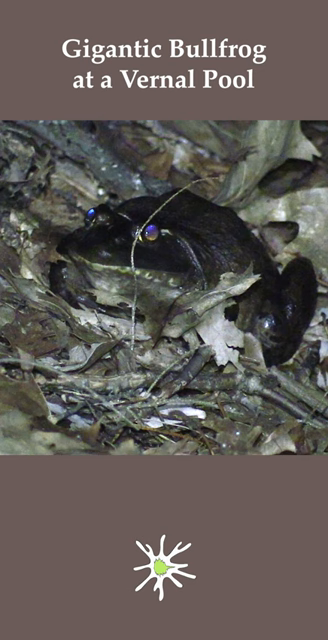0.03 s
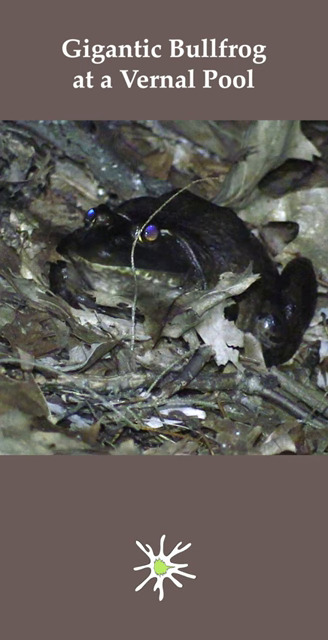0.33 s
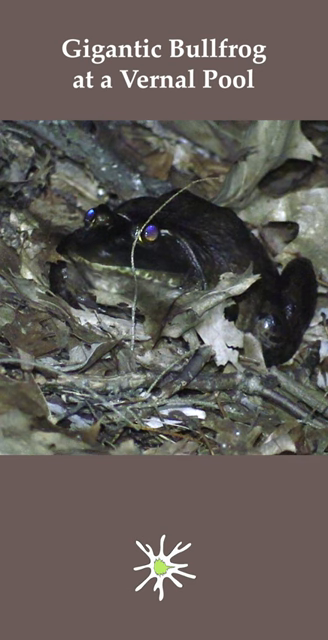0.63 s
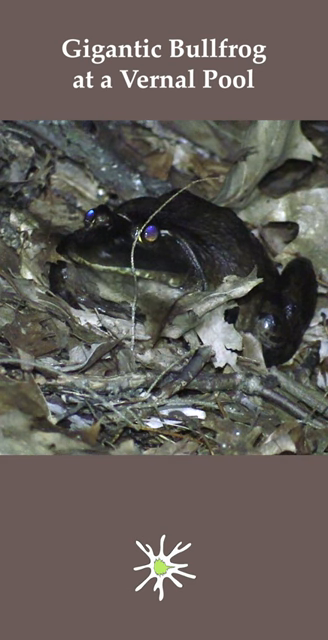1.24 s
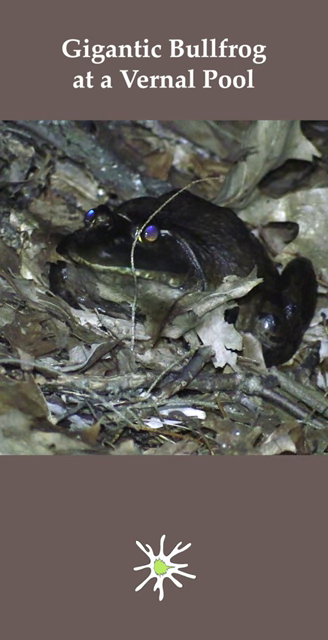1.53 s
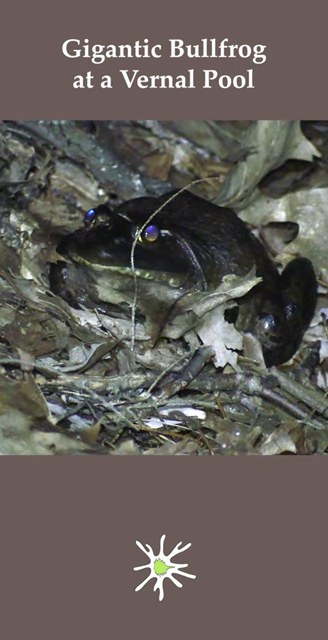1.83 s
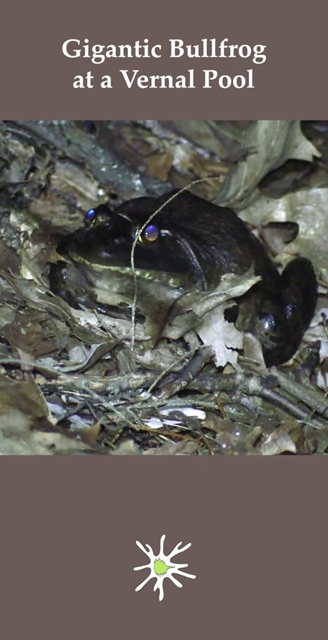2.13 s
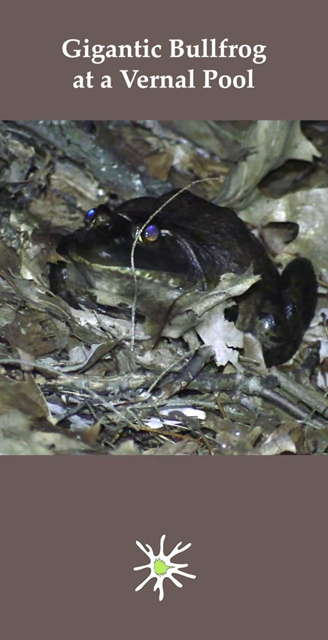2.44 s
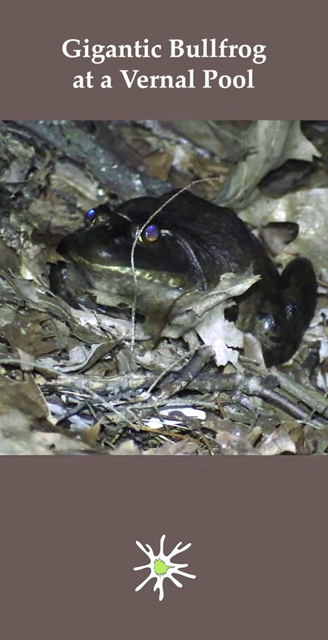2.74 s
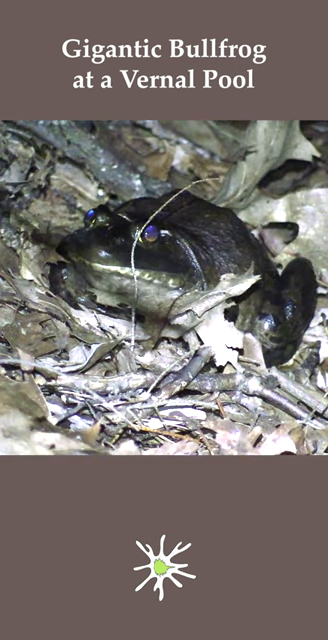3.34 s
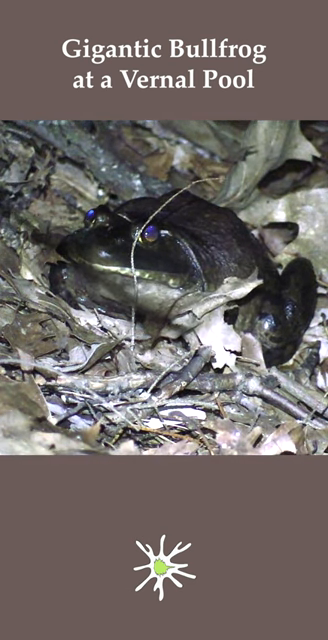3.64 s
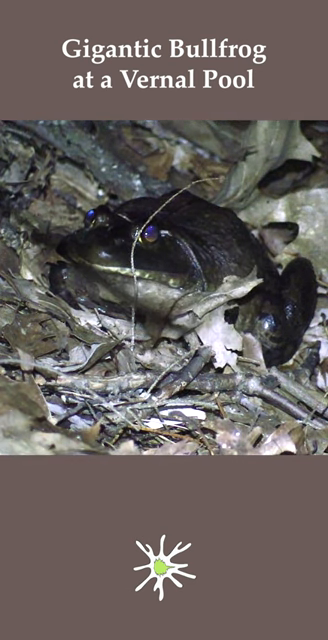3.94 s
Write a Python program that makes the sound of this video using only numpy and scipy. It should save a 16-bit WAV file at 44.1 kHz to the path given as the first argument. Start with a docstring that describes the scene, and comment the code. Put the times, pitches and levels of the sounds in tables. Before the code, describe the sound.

High, rising peeps of distant small frogs echo among trees over a soft rumble and hiss. A dry leaf snaps lightly near the microphone at the start, and about midway a single louder peep comes from the right.

```python
"""Tree frogs at a night pool

A stereo microphone by a woodland pool: one small frog peeps close on the right, the others far off.
Each peep is a pure rising whistle that the trees scatter into a long blurred tail.
Leaf litter ticks near the microphone; faint rustles and a few soft low bumps pass.
Under it all lie a distant rumble and a faint hum."""
import sys
import numpy as np
from scipy import signal
from scipy.fft import rfft, irfft
from scipy.io import wavfile
from scipy.ndimage import uniform_filter1d

SR = 44100
rng = np.random.default_rng(int(sys.argv[2]) if len(sys.argv) > 2 else 0)


def transcribe(u):
    """Save the signal u as a 16-bit wav file named by the first command-line argument.

    u: samples, shape (n,) or (channels, n), limited to [-1, 1]; the rate is SR.
    q: integer samples, one column per channel.
    """
    v = np.clip(np.atleast_2d(u).T, -1, 1)
    q = np.round(v * 32767).astype(np.int16)
    wavfile.write(sys.argv[1], SR, q)


N = 176400
HZ = np.fft.rfftfreq(N, 1 / SR)

# Distant rumble and hiss. Each row: frequency in Hz, relative spectral level in dB.
AIR_SPECTRUM = [(25, -23), (45, -13), (70, -3), (140, 1), (200, -1.5), (320, -3), (520, -4), (740, -5),
                (950, -4), (1400, -8.5), (2300, -16), (3800, -23), (4700, -25), (6000, -27), (9500, -31.5),
                (13000, -37), (15500, -43)]
# How alike the air is in the two channels. Each row: frequency in Hz, correlation.
AIR_CORRELATION = [(30, 0.48), (110, 0.99), (260, 0.81), (600, 0.48), (1300, 0.35), (4000, 0.51),
                   (12000, 0.64)]
# Where the air sits. Each row: frequency in Hz, pan in dB (always left minus right).
AIR_PAN = [(60, -2), (280, -1.5), (700, -5), (1400, -5), (4400, -1.5), (9000, -0.5)]
# The far hum. Each row: frequency in Hz, level in dB.
HUM_TONES = [(240, -52), (488, -58)]
# Frogs far off. Each row: start and length in seconds, first and last pitch in Hz, level and pan in dB.
FAR_PEEPS = [(-.29, 0.14, 2590, 2853, -29.5, 0), (-.13, 0.12, 3040, 3317, -27, -3),
             (-.04, .11, 3246, 3510, -32, -8), (0.176, 0.17, 2810, 3305, -31.5, -6),
             (0.438, 0.082, 3072, 3390, -24, -5.5), (.595, 0.14, 2930, 3265, -30, -5.5),
             (0.762, .09, 3150, 3428, -31, -5), (0.882, 0.12, 2950, 3302, -28.5, -3.5),
             (.885, 0.088, 3490, 3550, -37, -2), (1.104, 0.11, 2595, 2842, -30.5, -2),
             (1.615, 0.19, 2825, 3258, -33, -4), (2.03, .145, 2916, 3192, -31, -1),
             (2.214, 0.091, 2988, 3272, -30, -3.5), (2.51, .10, 2572, 2845, -31.5, -2.5),
             (2.629, 0.045, 3245, 3393, -34.5, -2.5), (2.828, 0.19, 2837, 3260, -31, -5.5),
             (3.674, 0.153, 2948, 3172, -34, -6.5)]
# The frog by the microphone. One row: start and length in seconds, first and last pitch in Hz.
CLOSE_PEEP = (1.723, .119, 2825, 3112)
# A peep's weak upper partials. Each row: multiple of the pitch, relative level in dB.
PEEP_PARTIALS = [(1.5, -33), (2, -42)]
# Faint rustles. Each row: start and length in seconds, centre in Hz, width in octaves, level in dB.
SOFT_RUSTLES = [(0.17, 0.28, 6600, 1, -53), (3.16, .28, 13400, .03, -65), (3.02, 0.59, 4100, 0.27, -55)]
# Low bumps. Each row: start and length in seconds, centre in Hz, level in dB.
LOW_BUMPS = [(.2, 0.13, 139, -39), (1.87, 0.079, 312, -41.5), (3.17, .09, 56, -47),
             (3.35, 0.14, 119, -39.5), (3.585, 0.071, 62, -40)]
# Dry leaves close by. Each row: start in seconds, level in dB, pan in dB.
LEAF_TICKS = [(.251, -19, -11), (.2562, -13, -8), (.5664, -41, -3), (.602, -31, -2.5)]
# The tone of one tick. Each row: frequency in Hz, relative level in dB.
TICK_SPECTRUM = [(500, -22), (2500, -6), (4100, -0.5), (5000, -12), (7500, -8.5), (9200, -3), (10800, -3.5),
                 (12100, 2.5), (13200, -10), (15500, -13.5)]

WOOD_T60_S, GROUND_T60_S = 1.23, 0.22  # a peep's decay among the trunks and off the ground
TICK_T60_S, LITTER_T60_S = 0.83, 0.0044  # a tick's decay among the trunks and in the litter


def amp(db):
    """Decibels to gain."""
    return 10 ** (np.asarray(db) / 20)


def unit(x):
    """Scales to rms 1."""
    return x / np.sqrt(np.mean(x ** 2) + 1e-20)


def curve(points, hz):
    """Reads a table on a log-frequency axis."""
    f, value = np.transpose(points)
    return np.interp(np.log(hz + 1), np.log(f + 1), value)


def pan(db):
    """Left and right gains of constant power; negative dB is to the right."""
    return unit(amp([[db / 2], [-db / 2]]))


def add(mix, start_s, sound):
    """Mixes a stereo sound in at start_s."""
    part = mix[:, max(round(start_s * SR), 0):][:, :sound.shape[1]]
    part += sound[:, :part.shape[1]]


def noise(spectrum):
    """Noise with the given spectrum, at rms 1."""
    return unit(irfft(spectrum * rfft(rng.standard_normal(N)), N))


def band_noise(hz, octaves):
    """Noise in a bell-shaped band around hz."""
    return noise(np.exp(-.5 * (np.log2((HZ + 1) / hz) / octaves) ** 2))


def night_air(level_db=-36.5, patch_db=0.44):
    """Distant rumble and hiss, a little to the right, with slight drifting patches in its spectrum."""
    grid = (N // 256 + 5, 513)  # time frames, frequency bins
    drift = uniform_filter1d(rng.standard_normal(grid), size=14, axis=0)
    patches = unit(uniform_filter1d(drift, size=8, axis=1))
    spectra = rng.standard_normal((2, *grid)) + 1j * rng.standard_normal((2, *grid))
    spectra *= amp(patch_db * patches)
    _, hiss = signal.istft(spectra.transpose(0, 2, 1), nperseg=1024, noverlap=768)
    left, unrelated = rfft(hiss[:, :N])
    likeness = curve(AIR_CORRELATION, HZ)
    right = likeness * left + np.sqrt(1 - likeness ** 2) * unrelated
    pan_db = curve(AIR_PAN, HZ)
    pair = np.array([left * amp(pan_db / 2), right * amp(-pan_db / 2)])
    return amp(level_db) * unit(irfft(pair * amp(curve(AIR_SPECTRUM, HZ)), N))


def hum(half_width_hz=7.7):
    """A faint hum from far away: narrow bands of noise that waver."""
    return sum(amp(db) * noise(1 / (1 + ((HZ - hz) / half_width_hz) ** 2)) for hz, db in HUM_TONES)


def peep(length, first_hz, last_hz, attack_s=0.005, release_s=0.015, swell_db=3, bend=0.2885):
    """One frog's whistle: it swells while its rise in pitch slows, then stops."""
    t = np.arange(0, length, 1 / SR)
    progress = t / length
    rise = progress + bend * progress * (1 - progress)
    phase = 2 * np.pi * np.cumsum(first_hz + (last_hz - first_hz) * rise) / SR
    tone = np.sin(phase) + sum(amp(db) * np.sin(multiple * phase) for multiple, db in PEEP_PARTIALS)
    fades = np.minimum(t / attack_s, 1) * np.minimum((length - t) / release_s, 1)
    return unit(tone * fades * amp(swell_db * progress))


def scatter(sound, t60_s, build_s=0.01):
    """Dense reflections that build and die away, unlike in each channel, with the sound's own energy."""
    t = np.arange(int(1.5 * SR)) / SR
    envelope = amp(-60 * t / t60_s) * (1 - np.exp(-t / build_s))
    reflections = rng.choice([-1., 1.], (2, len(t))) * envelope
    wet = signal.fftconvolve(sound[None], reflections, axes=1)
    return wet * np.linalg.norm(sound) / np.linalg.norm(wet, axis=1, keepdims=True)


def far_frogs(direct_db=-10.5, lead_s=0.5):
    """Distant peeps reach the microphone mostly as scatter from the trunks."""
    lead = round(lead_s * SR)  # room for peeps that start before time zero
    out = np.zeros((2, lead + N))
    for start, length, first_hz, last_hz, db, pan_db in FAR_PEEPS:
        call = amp(db) * peep(length, first_hz, last_hz)
        add(out, lead_s + start, pan(pan_db) * amp(direct_db) * call)
        add(out, lead_s + start, pan(pan_db) * scatter(call, WOOD_T60_S))
    return out[:, lead:]


def near_frog(level_db=-24, wood_db=-5, ground_db=-6):
    """One close peep comes straight from the right; trunks and ground spread it to both channels."""
    out = np.zeros((2, N))
    start, length, first_hz, last_hz = CLOSE_PEEP
    call = amp(level_db) * peep(length, first_hz, last_hz)
    trunks = amp(wood_db) * scatter(call, WOOD_T60_S)
    ground = amp(ground_db) * scatter(call, GROUND_T60_S)
    add(out, start, pan(db=-38) * call)
    add(out, start, pan(db=-4.5) * (trunks + ground))
    return out


def rustles():
    """Faint swells of narrow hiss, spread wide across the microphone."""
    out = np.zeros((2, N))
    for start, length, hz, octaves, db in SOFT_RUSTLES:
        swell = np.hanning(round(length * SR))
        hiss = np.array([band_noise(hz, octaves), band_noise(hz, octaves)])
        add(out, start, amp(db) * swell * hiss[:, :len(swell)])
    return out


def bumps():
    """Short dull swells of bass, dead centre."""
    out = np.zeros((2, N))
    for start, length, hz, db in LOW_BUMPS:
        swell = np.hanning(round(length * SR))
        thud = unit(band_noise(hz, octaves=0.23)[:len(swell)])
        add(out, start, pan(0) * amp(db) * swell * thud)
    return out


def click(spectrum):
    """The sharpest click that has the given spectrum (minimum phase), with peak 1."""
    hz = abs(np.fft.fftfreq(1024, 1 / SR))
    log_gain = np.log(amp(curve(spectrum, hz)))
    pulse = np.fft.ifft(np.exp(np.conj(signal.hilbert(log_gain)))).real
    return pulse / abs(pulse).max()


def leaf_ticks(litter_db=1.5, wood_db=-10.5):
    """Tiny bright snaps near the microphone rattle the litter and leave a faint tail among the trees."""
    out = np.zeros((2, N))
    for start, db, pan_db in LEAF_TICKS:
        snap = amp(db) * click(TICK_SPECTRUM)
        rattle = amp(litter_db) * scatter(snap, LITTER_T60_S, build_s=0.0001)
        add(out, start, pan(pan_db) * snap)
        add(out, start, pan(pan_db) * rattle)
        add(out, start, amp(wood_db) * scatter(snap, TICK_T60_S))
    return out


def scene():
    """The wood at night as it reaches the edge of the pool."""
    return night_air() + hum() + far_frogs() + near_frog() + rustles() + bumps() + leaf_ticks()


def record(dry, silence_s=0.0565, cutoff_hz=15850):
    """The microphone opens after a moment of silence, with the highest treble cut off."""
    opened = dry * (np.arange(N) / SR > silence_s)
    lowpass = signal.firwin(511, cutoff_hz, window=("kaiser", 9), fs=SR)
    return signal.oaconvolve(opened, lowpass[None], "same")


dry = scene()
out = record(dry)
transcribe(out)
```